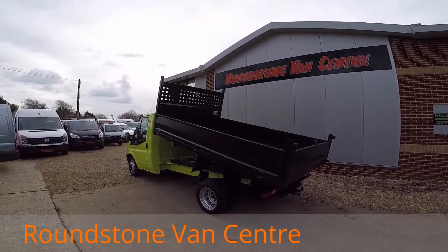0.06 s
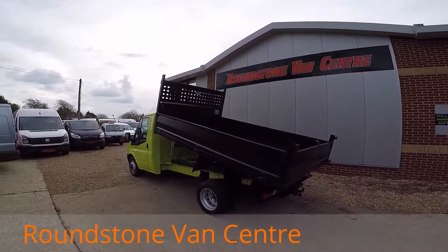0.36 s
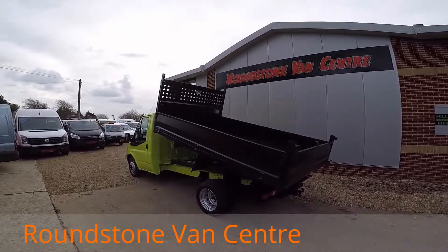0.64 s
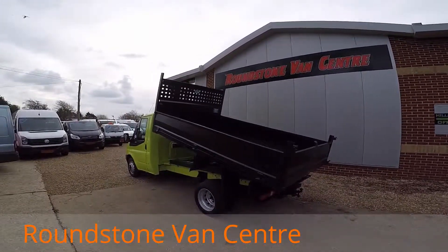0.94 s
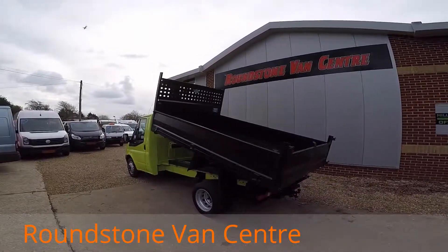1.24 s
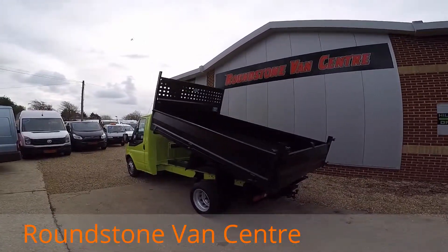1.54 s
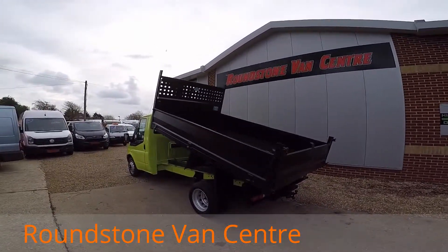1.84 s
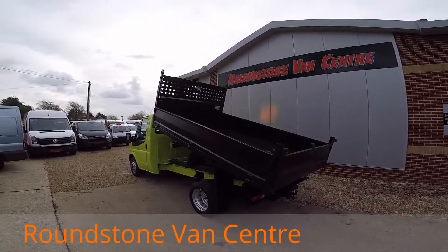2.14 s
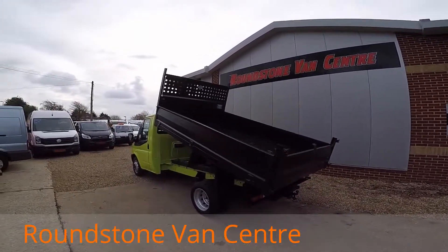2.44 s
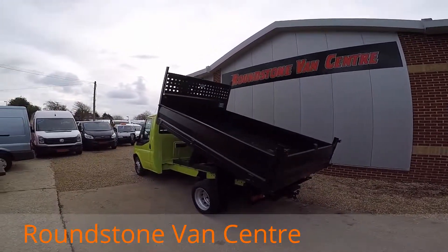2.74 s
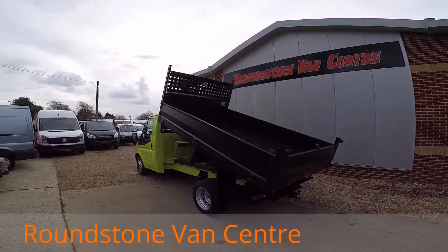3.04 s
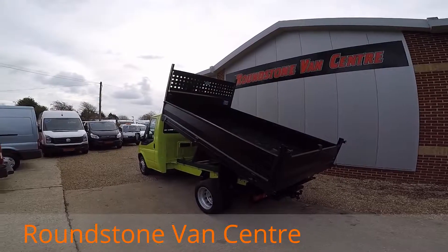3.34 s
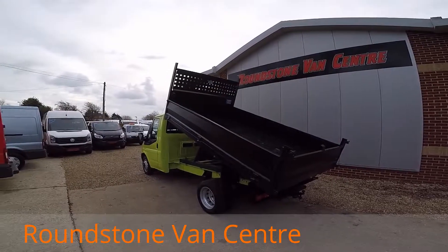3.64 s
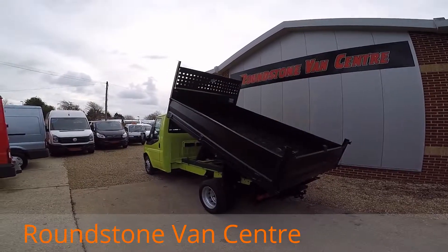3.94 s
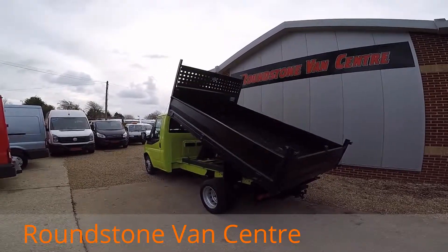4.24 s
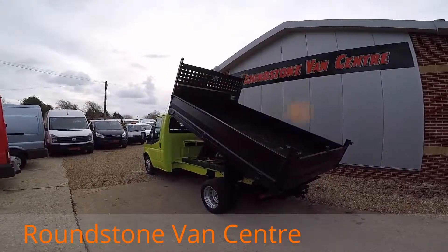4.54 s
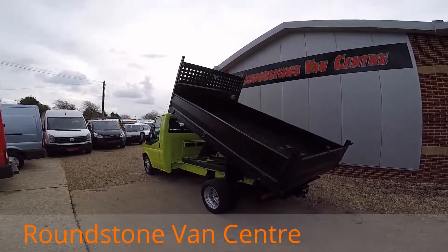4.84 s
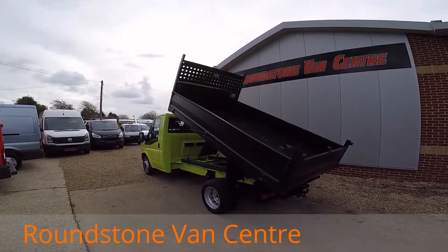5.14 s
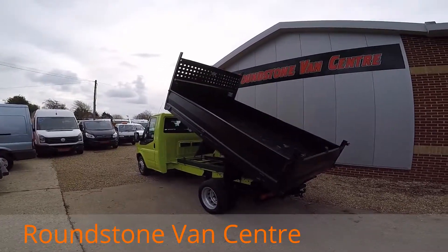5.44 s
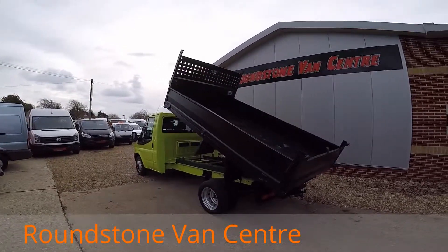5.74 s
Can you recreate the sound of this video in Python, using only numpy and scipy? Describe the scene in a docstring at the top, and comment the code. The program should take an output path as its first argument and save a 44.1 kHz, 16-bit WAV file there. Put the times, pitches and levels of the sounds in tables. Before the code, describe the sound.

A truck's hydraulic pump whines and buzzes steadily over a low idling engine as its tipper body rises, clunking once, with wind rumbling.

```python
"""A whining electric pump and an idling engine: a truck raises its tipper body on an open forecourt.
The pump's gear teeth whine as they meet, its shaft buzzes and its oil hisses. The ram that lifts
the body clunks into its next stage, and the pump sags, then recovers. The steel body drones
hollowly, a vehicle slows nearby, and a breeze rumbles on the microphone."""
import sys
import numpy as np
from scipy import signal
from scipy.fft import rfft, irfft
from scipy.io import wavfile
from scipy.ndimage import uniform_filter1d, minimum_filter1d

SR = 44100
rng = np.random.default_rng(int(sys.argv[2]) if len(sys.argv) > 2 else 0)


def wav_record(signal):
    """Record a signal, one row per channel, as 16-bit PCM in the file named by sys.argv[1]."""
    frames = np.transpose(np.atleast_2d(signal))
    bounded = np.clip(frames, -1, 1)
    # unit amplitude maps onto the largest positive 16-bit level
    quanta = np.round(bounded * 32767).astype(np.int16)
    wavfile.write(sys.argv[1], SR, quanta)


N = 259749
TIME = np.arange(N) / SR
FREQ = np.maximum(np.arange(N // 2 + 1) * SR / N, 1)
USUAL_SHAFT_HZ, FIRING_HZ = 50, 26.925  # pump turns and idling engine firings per second

# Levels in the tables are relative: the functions add their own gains.
# Four noises: deep wind, gusts, machinery under the body and hissing oil. Each lists
# (frequency [Hz], left level [dB], right level [dB], likeness of the sides [1 same, -1 opposite])
RUMBLE_SPECTRUM = [(8, -48.5, -44, 1), (22, -40, -34.5, 0.99), (38, -34.5, -33.5, 0.96),
                   (64.3, -36.5, -33, 1), (90, -40.5, -38, 0.89), (127, -43.5, -47, 0.9),
                   (183, -52, -47, 0.56), (252, -49.5, -47.5, 0.83), (372, -63, -63.5, 0.57)]
GUST_SPECTRUM = [(40, -59.5, -72.5, -0.078), (82.4, -48.5, -44, -1.9), (102.4, -34, -58, 0.51),
                 (135, -43, -62.5, 0.1), (218, -44, -49, -0.74), (289.5, -44.5, -58, -0.99),
                 (377, -68, -71, 1)]
ROAR_SPECTRUM = [(120, -82, -67, 0.91), (305, -59.5, -55.5, -0.18), (414, -64.5, -52, 0.46),
                 (508, -60, -49.5, -0.31), (590, -54, -58, -0.37), (860, -59.5, -56.5, -0.83),
                 (1014, -59.5, -64, -0.56), (1236, -76.5, -61.5, -0.44), (1285, -65, -71, 0.8),
                 (1567, -77.5, -69, 0.4), (2230, -95, -81.5, 0.051)]
HISS_SPECTRUM = [(1290, -84, -92, 0.5), (1880, -72, -72.5, 0.53), (2310, -81, -77.5, 0.94),
                 (2436, -76.5, -73.5, 0.69), (3580, -83.5, -82, 0.67), (4400, -77, -77.5, 0.44),
                 (6360, -77, -77, 0.12), (6840, -85, -83.5, -0.1), (7940, -93.5, -82.5, 0.0),
                 (7960, -105, -92, -0.18), (9800, -107, -93.5, 0.35), (13200, -132, -115, -0.1)]
# strength of the deep wind and of the gusts: (time [s], level [dB])
RUMBLE_LEVEL = [(0, -1.5), (.9, -3.5), (.98, 3), (1.1, -3.5), (2.5, -6), (3.7, -1.5), (5.89, 0.5)]
GUST_LEVEL = [(0, 0), (1.1, -2), (1.4, 2.5), (3.3, 0), (4.5, -2), (5.89, -11.5)]
# the slowing vehicle's engine: (time [s], firing rate [Hz], level [dB])
VEHICLE_PATH = [(3.2, 62.56, -50), (3.7, 61.77, -26), (4.1, 60.47, -22), (4.55, 56.75, -25.5),
                (4.9, 50.12, -25.5), (5.351, 46, -29), (5.7, 44.8, -49)]
# its harmonics (whole multiples of the firing rate), from the first up: (level [dB])
VEHICLE_HARMONICS = [-1, -1.5, -6.5, -4.5]
# the truck's idle: (multiple of the firing rate, level with body low [dB], level with body raised [dB])
IDLE_HARMONICS = [(1, -18.5, -33), (2, -27, -21.5), (3, -18.5, -20.5), (4, -27.5, -32), (5, -24.5, -41),
                  (7, -40.5, -46), (8, -38, -36), (14, -46.5, -40.5), (15, -46.5, -40.5)]
# the body's hollow drone at the top of each throb: (time [s], level [dB])
THROB_LEVEL = [(.2, -10), (.85, -13.5), (1.25, -20), (2.03, -7.5), (2.5, -20), (3.55, -10.5), (4.8, -20),
               (5.5, -11)]
# a deeper drone that grows as the body rises: (time [s], level [dB])
BOOM_LEVEL = [(0, -45), (4.1, -31), (4.3, -21), (5.05, -23), (5.4, -22), (5.89, -15)]
# brief, clear hums of the body: (peak time [s], fade time [s], pitch [Hz], level [dB])
BODY_HUMS = [(2.083, 0.15, 348, -26.5), (4.66, 0.11, 204.4, -18), (5.012, 0.14, 221.6, -18),
             (5.133, 0.041, 167.3, -15.5), (5.71, .085, 216.6, -9), (5.889, 0.051, 223, -10.5)]
# blows of the ram: (time [s], level [dB], top of the thud's range [Hz], length of the push [s])
RAM_BLOWS = [(2.217, -9.5, 640, .016), (2.248, -4.5, 390, 0.015), (2.3, -14, 345, 0.025),
             (2.372, -9.5, 250, 0.018)]
# notes the struck body rings with: (pitch [Hz], time to fade by 60 dB [s], level [dB])
BODY_NOTES = [(129, 0.24, 6), (200, 0.18, 4), (331, 0.13, -2), (358.4, 0.62, -7)]
# the shaft speeds up as the load lightens and drops back at the ram's next stage: (time [s], speed [Hz])
SHAFT_SPEED = [(0, 49.25), (.2, 49.6), (.63, 50.03), (.85, 49.78), (1.35, 50.25), (1.85, 50.65),
               (2.24, 50.7), (2.31, 48.4), (2.39, 48.8), (2.48, 48.45), (2.75, 49.08), (3.15, 49.42),
               (4.3, 50), (5.89, 50.65)]
# strength of the oil flow's sound: (time [s], level [dB])
FLOW_LEVEL = [(0, 1.5), (.4, -1), (1.45, -0.5), (1.85, 1.5), (2.21, 0.9), (2.33, -2), (2.6, -2.5),
              (2.8, -1), (3.45, 1.5), (5.2, -1.5), (5.89, -0.5)]
# the pump's overtones: (multiple of the shaft speed, steady level [dB], right minus left [dB])
SHAFT_OVERTONES = [(10, -37, 9), (12, -45.5, 9.5), (15, -45, 12), (20, -48.5, 10.5), (26, -55.5, 12),
                   (27, -50.5, 11.5), (39, -57, 7), (52, -59, -1), (65, -60, 1.5), (77.3, -63, -1),
                   (78.3, -59, -3), (79.06, -68, -6), (85, -69.5, -4), (91.6, -63, -7.5), (94, -60.5, -1),
                   (95.2, -62, -1.5), (97, -63.5, -2), (101, -61.5, -12), (105, -60, -8), (117.1, -57, -6),
                   (118.8, -62, -3), (123.2, -55, -3.5), (129, -58, -6.5), (143, -66.5, 13)]
# overtones flare as the body tilts; a row sounds only if its rounded multiple matches an overtone's:
# (multiple of the shaft speed, peak time [s], fade time [s], level of the added part [dB])
OVERTONE_FLARES = [(10, 3.5, 0.21, -47), (26, 0.24, 0.54, -47), (26, 4.24, .22, -48),
                   (26, 5.78, 0.34, -45.5), (27, 1.85, 0.57, -46), (27, 5.7, .3, -47),
                   (39, 0.86, 0.12, -47), (39, 1.9, 0.16, -54), (39, 2.52, 0.24, -51), (39, 3.5, 0.11, -58),
                   (39, 4.65, 0.17, -55), (65, 0.22, 0.05, -51), (65, .7, .2, -56.5),
                   (65, 1.13, 0.09, -53.5), (65, 3.15, 0.11, -54), (65, 3.89, 0.14, -50),
                   (65, 4.57, .25, -61), (75.8, 1.95, 0.21, -58), (77.3, 5.42, 0.24, -51.5),
                   (78.1, 1.5, 0.27, -57), (78.7, 4.7, 0.54, -56), (80.9, 3.3, 0.29, -49),
                   (85, 1.05, .08, -55), (85, 4.45, .12, -52), (94.6, 2, 0.18, -55.5), (97, 3.2, 0.75, -58),
                   (101, 3.11, .14, -52.5), (105, 2.06, .25, -59), (105, 3.6, 0.45, -57),
                   (116, 4, 0.28, -58), (129, .12, 0.048, -56), (143, 1.75, 0.28, -56)]
# the whine of the gear teeth: (time [s], level [dB])
WHINE_LEVEL = [(0.0, -42), (0.34, -26), (0.62, -25.5), (1.71, -31), (1.8, -36), (2.25, -32), (3.21, -34.5),
               (3.53, -28.5), (5.49, -33.5), (5.53, -40.5), (5.89, -34.5)]


def undb(db):
    """Turn decibels into a gain to multiply by."""
    return 10 ** (np.asarray(db) / 20)


def curve(rows):
    """Join (time, value) rows with straight lines."""
    return np.interp(TIME, *np.transpose(rows))


def swell(peak_s, fade_s):
    """A smooth rise to 1 and back down."""
    return np.exp(-((TIME - peak_s) / fade_s) ** 2)


def unit(x):
    """Scale a signal to an average power of 1."""
    return x / np.sqrt(np.mean(np.abs(x) ** 2))


def wander(hz):
    """A random drift, about hz fast, in complex numbers: it can shift a tone's level and phase."""
    steps = np.arange(1200) / 200
    noise = rng.standard_normal((2, len(steps)))
    keep_slow = np.exp(-(np.fft.fftfreq(len(steps), steps[1]) / hz) ** 2)
    drift = np.fft.ifft((noise[0] + 1j * noise[1]) * keep_slow)
    return unit(np.interp(TIME, steps, drift))


def walk(hz):
    """A random drift in ordinary numbers, typically of size 1."""
    return unit(wander(hz).real)


def angle(hz):
    """The angle reached by something that turns hz times a second."""
    return 2 * np.pi * np.cumsum(hz) / SR


def stereo(wave, left_db, right_db, lag):
    """Turn a complex wave into left and right sound; the right trails by lag radians."""
    left = undb(left_db) * wave.real
    right = undb(right_db) * (wave * np.exp(-1j * lag)).real
    return np.sqrt(2) * np.array([left, right])


def white():
    """Two unrelated white noises."""
    return rng.standard_normal((2, N))


def band_noise(low_hz, high_hz):
    """Noise between two frequencies."""
    band = signal.butter(4, [low_hz, high_hz], "band", fs=SR, output="sos")
    return unit(signal.sosfilt(band, rng.standard_normal(N)))


def colour(pair, spectrum):
    """Shape two unrelated noises into the left and right sound that a spectrum table describes."""
    hz, *columns = np.transpose(spectrum)
    left_db, right_db, likeness = (np.interp(np.log(FREQ), np.log(hz), c) for c in columns)
    likeness = np.clip(likeness, -1, 1)
    shared, opposed = rfft(pair) * np.sqrt([1 + likeness, 1 - likeness])
    fade_ends = 1 / (1 + (FREQ / hz[-1]) ** 8) / (1 + (hz[0] / FREQ) ** 8)
    sides = np.array([undb(left_db) * (shared + opposed), undb(right_db) * (shared - opposed)])
    return irfft(fade_ends * sides, N) * np.sqrt(SR) / 2


def breeze():
    """Wind rumbles on both sides of the microphone, and gusts buffet mostly the left."""
    rumble = colour(white(), RUMBLE_SPECTRUM) * undb(curve(RUMBLE_LEVEL) + 0.3 * walk(2))
    gusts = colour(white(), GUST_SPECTRUM) * undb(curve(GUST_LEVEL) + 2.5 * walk(4))
    return rumble + gusts


def slowing_vehicle(exhaust_hz=169.7, width_hz=5, boost_db=13, rough=0.18):
    """A nearby engine runs down; a harmonic booms when it falls through the exhaust's own note."""
    times, *columns = np.transpose(VEHICLE_PATH)
    firing_hz, db = (np.interp(TIME, times, c) for c in columns)
    hum = 0
    for k, harmonic_db in enumerate(VEHICLE_HARMONICS, 1):
        boom_db = boost_db / (1 + ((k * firing_hz - exhaust_hz) / width_hz) ** 2)
        wave = np.exp(1j * k * angle(firing_hz)) * (1 + rough * wander(6))
        hum += undb(db + harmonic_db + boom_db) * wave
    return stereo(hum, left_db=-2.5, right_db=1.5, lag=0)


def idling_engine(unsteady=0.0017, rough=0.041):
    """The truck's firings make low, slightly uneven tones whose balance shifts as the body lifts."""
    firing = angle(FIRING_HZ * (1 + unsteady * walk(3.05)))
    hum = 0
    for k, low_db, raised_db in IDLE_HARMONICS:
        wave = np.exp(1j * (k * firing + 2 * np.pi * rng.random()))
        hum += undb(np.linspace(low_db, raised_db, N)) * wave * (1 + rough * wander(4.5))
    return stereo(hum, left_db=-3, right_db=1, lag=0)


def ringing_panel(hz, stray_hz, rough):
    """A steel panel kept ringing: its pitch strays and its level shivers."""
    return np.exp(1j * angle(hz + stray_hz * walk(12.8))) * unit(1 + rough * wander(30))


def body_drones(throb_hz=3.7, throb_peak_s=0.26, depth_db=6.5):
    """The rising body gives off a hollow throb, a deeper boom and brief hums."""
    dip_db = depth_db * np.sin(np.pi * throb_hz * (TIME - throb_peak_s)) ** 2
    throb = ringing_panel(276.4, stray_hz=2.86, rough=0.97) * undb(curve(THROB_LEVEL) - dip_db)
    wash = unit(signal.hilbert(band_noise(152.5, 245)))  # nearby panel notes blurred together
    panel = ringing_panel(215.5, stray_hz=3, rough=0.18)
    octave = panel ** 2
    boom = (panel + undb(-19) * octave + undb(-6) * wash) * undb(curve(BOOM_LEVEL))
    hums = sum(ringing_panel(hz, stray_hz=1.52, rough=0.11) * undb(db) * swell(peak_s, fade_s)
               for peak_s, fade_s, hz, db in BODY_HUMS)
    return (stereo(throb, left_db=-4, right_db=-9, lag=2.334)
            + stereo(boom + hums, left_db=-7, right_db=1, lag=0.59))


def ram_clunks(ring_rise_s=0.0071, knock_fade_s=0.0055):
    """Each oil-cushioned blow of the ram gives a brief knock, a dull thud and a ring of the body."""
    blows = 0
    for start_s, db, top_hz, push_s in RAM_BLOWS:
        age = np.maximum(TIME - start_s, 0)
        thud = band_noise(110, top_hz) * age / push_s * np.exp(1 - age / push_s)
        ring = sum(undb(note_db - 60 * age / fade_s) * np.sin(2 * np.pi * hz * age)
                   for hz, fade_s, note_db in BODY_NOTES)
        ring *= 1 - np.exp(-age / ring_rise_s)
        knock = band_noise(450, 1400) * (age > 0) * np.exp(-age / knock_fade_s)
        blows += undb(db) * (undb(-17) * knock + undb(-1) * thud + undb(-4) * ring)
    return stereo(signal.hilbert(blows), left_db=-14, right_db=-4, lag=0.3)


def machinery_roar(flow_db, start_db=-2.06, rise_db_per_s=0.57):
    """A roar from under the body follows the oil flow and opens up as the body lifts."""
    roar = colour(white(), ROAR_SPECTRUM)
    return roar * undb(0.8 * walk(15) + start_db + rise_db_per_s * TIME + 0.92 * flow_db)


def thin_whistle(hz=5000, db=-60):
    """A faint, thin electronic whistle on one steady pitch."""
    wave = np.exp(2j * np.pi * hz * TIME) * undb(db) * (1 + 0.5 * wander(7.4))
    return stereo(wave, left_db=7.5, right_db=-1.5, lag=0.91)


def oil_hiss(shaft, surge=0.11):
    """Flowing oil hisses, surging twice for each turn of the shaft."""
    return colour(undb(-2) * white() * (1 + surge * np.cos(2 * shaft)), HISS_SPECTRUM)


def shaft_ticks(shaft, paths=4, harmonics=250, range_db=36.5, slots=8192):
    """Ticks repeat every turn and arrive by several paths, whose shares drift at random."""
    place_in_turn = (shaft / (2 * np.pi) * slots).astype(int) % slots
    strength = undb(-range_db * rng.random((paths, harmonics)))  # each path favours a few harmonics
    patterns = irfft(strength * np.exp(2j * np.pi * rng.random((paths, harmonics))), slots)
    ticks = unit(sum(pattern[place_in_turn] * walk(1.5) for pattern in patterns))
    return ticks * np.sqrt(harmonics * USUAL_SHAFT_HZ / (SR / 2))  # as strong per Hz as white noise


def shaft_buzz(shaft, low_cut_hz=4500):
    """The shaft's ticks are tiny and sharp, so their buzz lies mostly in the treble."""
    ticks = np.array([shaft_ticks(shaft) for _ in range(2)])
    treble = signal.sosfilt(signal.butter(2, low_cut_hz, "high", fs=SR, output="sos"), ticks)
    return colour(undb(-6) * treble, HISS_SPECTRUM)


def shaft_overtones(shaft, fading=0.006, flicker=0.15, shake=0.13):
    """Overtones flare as the tilting body lets them out and waver with its echoes, the high ones most."""
    tones = 0
    for multiple, db, pan_db in SHAFT_OVERTONES:
        k = round(multiple)
        flares = sum(undb(flare_db) * swell(peak_s, fade_s)
                     for which, peak_s, fade_s, flare_db in OVERTONE_FLARES if round(which) == k)
        waver = unit(1 + fading * k * wander(4) + flicker * wander(25))
        wave = np.exp(1j * k * shaft) * (undb(db) + flares) * waver
        # low tones reach the two sides nearly opposed; high ones slip further apart with pitch
        hz = k * USUAL_SHAFT_HZ
        lag = 2.5 if hz < 1650 else -(hz / 5400) ** 3
        tones += stereo(wave, -pan_db / 2, pan_db / 2, lag)
    # the idling engine shakes the truck, so the tones pulse at its firing rate
    return tones * (1 + shake * np.cos(2 * np.pi * FIRING_HZ * TIME))


def gear_whine(shaft, teeth=13, wobble_db=0.5):
    """The gear teeth meet so quickly that they make one clear tone."""
    wave = np.exp(1j * teeth * shaft) * undb(curve(WHINE_LEVEL) + wobble_db * walk(1.3))
    return stereo(wave, left_db=3.1, right_db=10.5, lag=3.03)


def stage_choke(start_s=2.252, dip_db=-3.5, onset_s=0.053, recover_s=0.028):
    """A dip in gain: the jolt into the ram's narrower next stage briefly chokes the oil flow."""
    age = TIME - start_s
    jolt = np.clip(age / onset_s, 0, 1) * np.exp(-np.maximum(age - onset_s, 0) / recover_s)
    return undb(dip_db * jolt)


def gear_pump(flutter=0.0005, shiver_db=0.38):
    """One shaft times the whine, buzz, hiss and overtones; all but the whine swell with the oil flow."""
    flow_db = curve(FLOW_LEVEL) + shiver_db * walk(7.6)
    shaft = angle(curve(SHAFT_SPEED) * (1 + flutter * walk(11.4)))
    whine = gear_whine(shaft)
    fizz = thin_whistle() + shaft_buzz(shaft) + oil_hiss(shaft)
    roar = machinery_roar(flow_db)
    return whine + roar + stage_choke() * undb(flow_db) * (shaft_overtones(shaft) + fizz)


def scene():
    """Everything on the forecourt, added together."""
    return gear_pump() + idling_engine() + slowing_vehicle() + breeze() + body_drones() + ram_clunks()


def record(dry):
    """Ease the volume down around any peak above the ceiling, then cut the highest treble."""
    ceiling, hold_samples, top_hz = 0.93, SR // 40, 11500
    allowed = ceiling / np.maximum(np.abs(dry).max(axis=0), ceiling)
    gain = uniform_filter1d(minimum_filter1d(allowed, hold_samples), hold_samples)
    treble_cut = signal.ellip(8, 0.2, 70, top_hz, fs=SR, output="sos")
    return signal.sosfilt(treble_cut, dry * gain)


dry = scene()
out = record(dry)
wav_record(out)
```